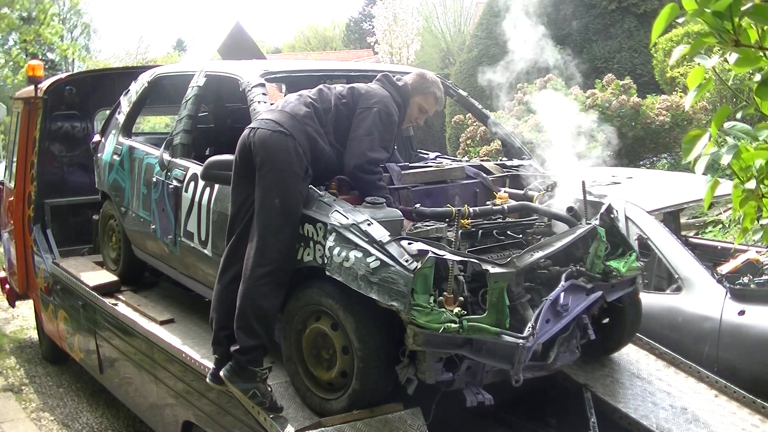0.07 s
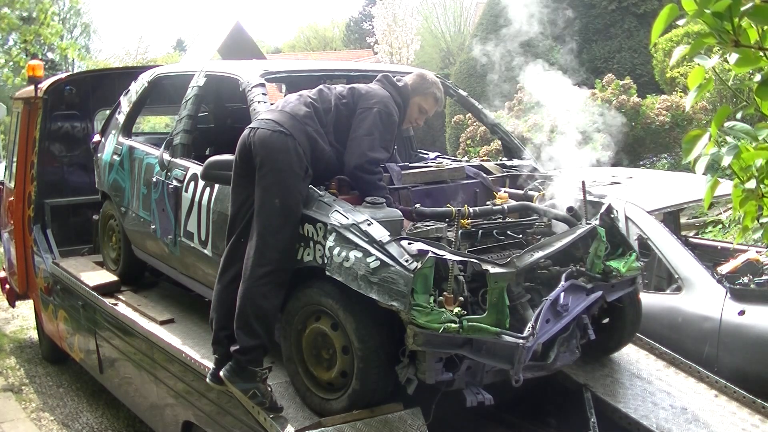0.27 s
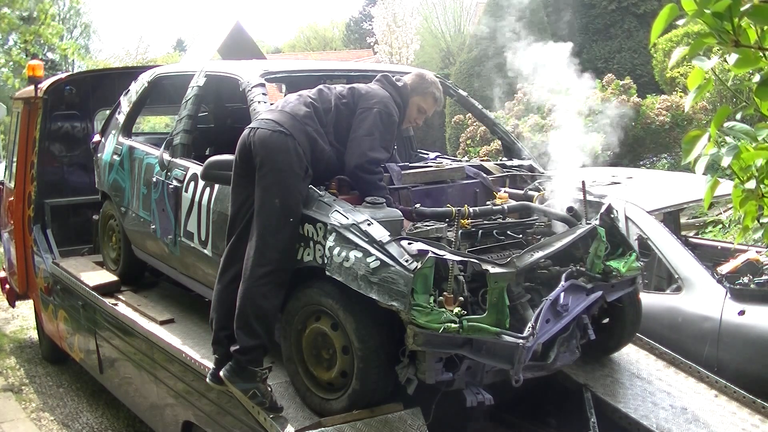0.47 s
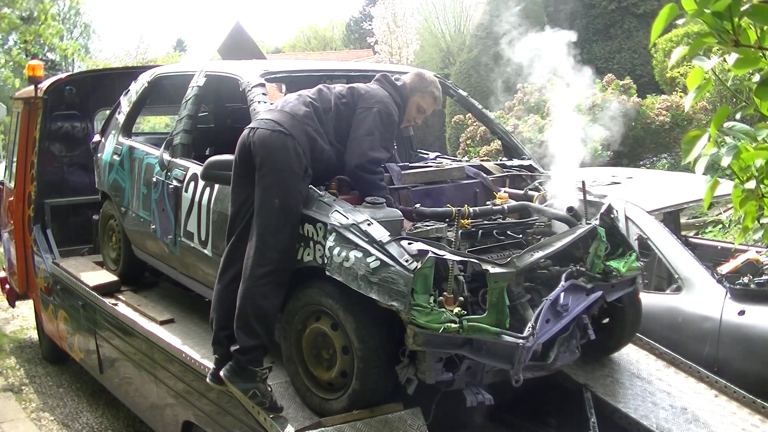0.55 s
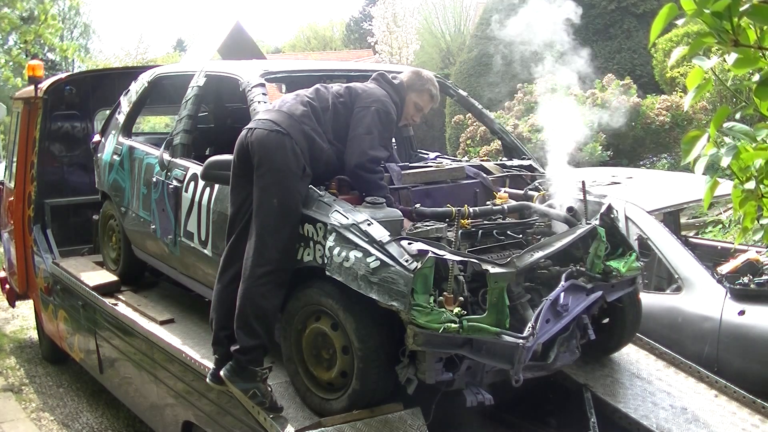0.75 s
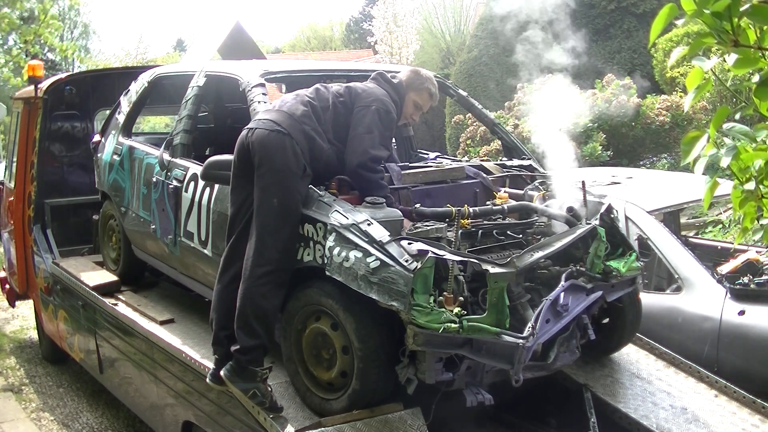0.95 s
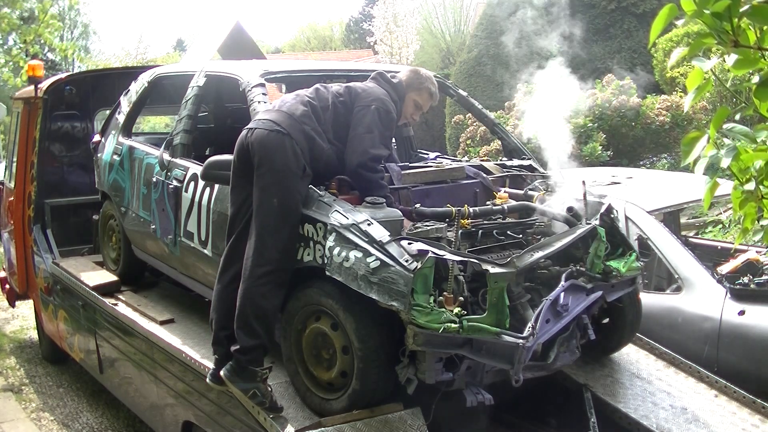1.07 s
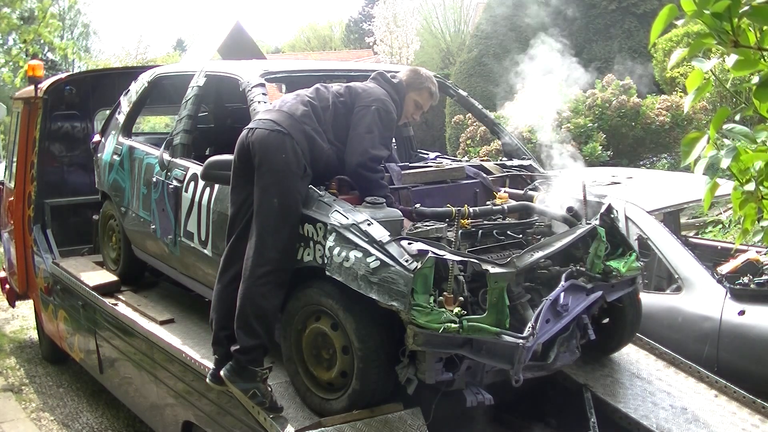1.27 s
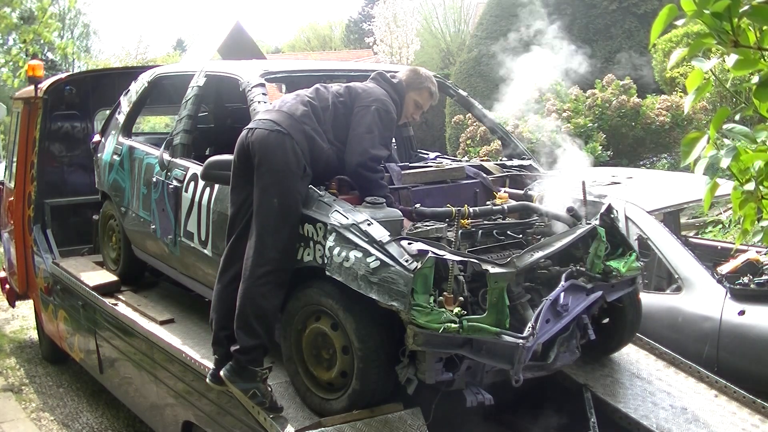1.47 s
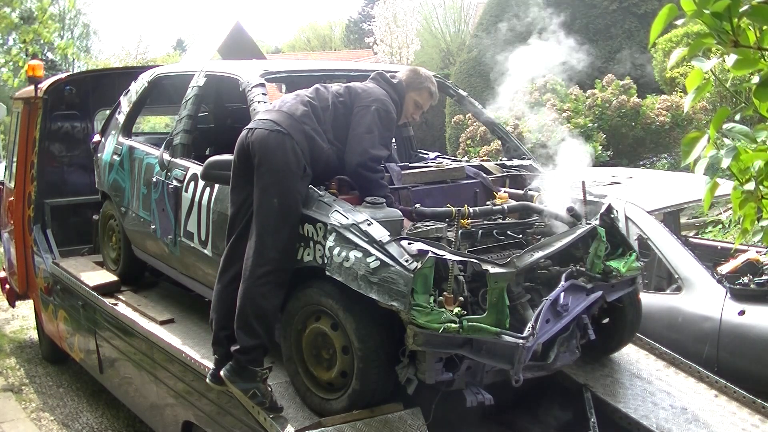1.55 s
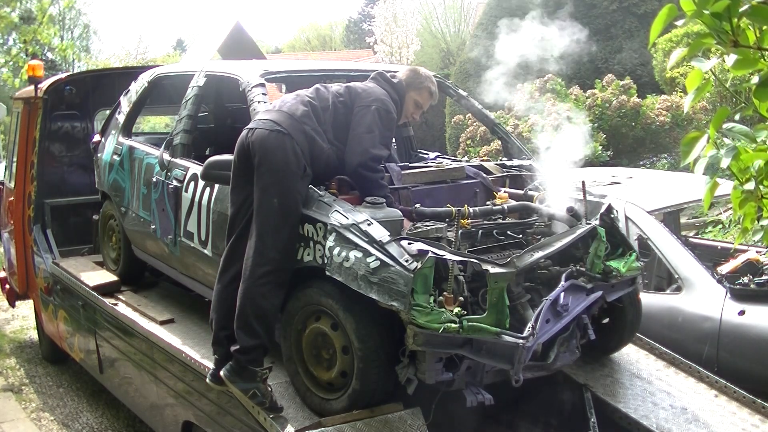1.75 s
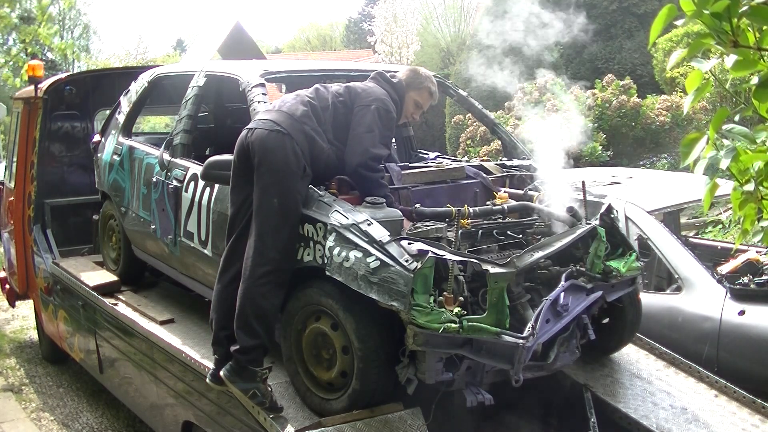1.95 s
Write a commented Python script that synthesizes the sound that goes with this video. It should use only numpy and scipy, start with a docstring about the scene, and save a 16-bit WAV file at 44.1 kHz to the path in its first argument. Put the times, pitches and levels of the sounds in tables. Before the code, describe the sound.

A worn car engine is cranked by its starter, grinding in uneven surges with harsh clanks and brief metal squeaks. It weakens near the end and never catches, heard from near the open engine bay outdoors.

```python
"""A worn engine that won't start

A starter cranks in an open engine bay, outdoors, and the engine never catches. The pinion grinds on
the ring gear in uneven surges and the engine kicks back with harsh clanks that set loose parts ringing.
Dry metal squeaks, a bearing squeals, the starter groans and the cylinders puff weakly.
Block and body panels ring; the yard answers briefly over a faint bed of air."""
import sys
import numpy as np
from scipy import signal
from scipy.fft import rfft, irfft, next_fast_len
from scipy.io import wavfile
from scipy.ndimage import map_coordinates

SR = 44100
rng = np.random.default_rng(int(sys.argv[2]) if len(sys.argv) > 2 else 0)


def inscribe(sig):
    """Save sig as 16-bit PCM at rate SR to the path in sys.argv[1].

    A 1-D sig is mono; a 2-D sig holds one channel per row.
    Samples are clipped to [-1, 1] before scaling.
    """
    pcm = np.round(np.clip(np.atleast_2d(sig).T, -1, 1) * 32767)
    wavfile.write(sys.argv[1], SR, pcm.astype(np.int16))


N = 2 * SR


# bright, gritty EQ of the grind: (frequency [Hz], gain [dB])
GRIND_EQ = [(20, -78), (150, -29), (450, -32), (700, -23), (1100, -11.5), (1650, 1.5), (2600, 3),
            (3150, -0.5), (4000, 4.5), (5000, 1.5), (6400, -3), (7400, -10.5), (10000, -13), (11300, -28.5),
            (15800, -36)]
def grinding():
    """The pinion grinds on the ring gear in surges and keeps rubbing between them."""
    rub = amp(-8) * envelope(CHURN_LEVELS)
    load = np.hypot(rasps(), rub)
    return amp(9) * coloured(teeth(rate_hz=232.8, scrape_db=0) * load, GRIND_EQ)


# surges of the pinion on the ring gear: (start [s], level [dB], attack [s], hold [s])
GEAR_RASPS = [(0.2, -31, 0.0036, 0.013), (0.378, -36.5, 0.0024, 0.014), (0.555, -34, 0.0053, 0.06),
              (0.699, -31, 0.0038, 0.02), (0.808, -32.5, 0.0096, 0.023), (0.95, -42, 0.0046, 0.022),
              (0.993, -32.5, 0.0033, 0.031), (1.159, -32.5, 0.011, 0.056), (1.267, -32, 0.0041, 0.057),
              (1.393, -28, .001, 0.011), (1.442, -40, 0.012, 0.048), (1.604, -35.5, 0.059, 0.012),
              (1.969, -38.5, 0.028, .02)]
def rasps(release_db_per_s=176):
    """Envelope of the load on the gear: each rasp bites, holds and lets go."""
    load = np.zeros(N)
    for start, db, attack, hold in GEAR_RASPS:
        t = clock() - start
        release_db = release_db_per_s * np.maximum(t - attack - hold, 0)
        load = np.maximum(load, np.clip(t / attack, 0, 1) * amp(db - release_db))
    return load


def teeth(rate_hz, scrape_db, jitter=.08, spread_db=3):
    """Gear teeth strike unevenly, each hit trailed by a short scrape; rms 1."""
    phase = np.cumsum(rate_hz * np.exp(jitter * wobble(90))) / SR
    tooth = phase.astype(int)
    strength = amp(spread_db * (2 * rng.random(N) - 1))[tooth]
    hits = np.diff(tooth, prepend=0) * strength * rng.choice([-1, 1], N)
    scrape = rng.standard_normal(N) * strength * np.exp(-(phase % 1))
    return unit(unit(hits) + amp(scrape_db) * unit(scrape))


# kickbacks through the drive, the last row a brief hissing puff: (peak time [s], level [dB], rise [s], fall
# [s], bright over dull [dB])
KICKBACKS = [(0.212, -11.5, 0.00093, 0.0078, 19.5), (0.2204, -14.5, 0.0017, 0.006, 7.5),
             (0.3457, -16.5, 0.0045, 0.022, -5), (0.615, -23.5, 0.0065, 0.0079, -16),
             (0.671, -17, 0.019, 0.028, -13), (.738, -32.5, 0.0069, 0.071, 3),
             (.856, -25.5, 0.033, 0.012, 29), (1.05, -16, .014, 0.033, -13.5),
             (1.231, -23, 0.0028, 0.023, -7), (1.323, -25, 0.016, 0.016, -21),
             (1.416, -27, 0.0033, 0.013, 0), (1.494, -19, 0.0053, 0.013, 10),
             (1.542, -24, 0.0053, 0.01, 1.5), (1.913, -34, 0.017, 0.013, 13)]
# dull body of the block's clank: (frequency [Hz], gain [dB])
BLOCK_EQ = [(20, -75), (120, -40), (250, -21), (480, -15), (650, -15), (850, -7), (1300, -1), (2400, 0),
            (3200, -7), (5000, -14), (8000, -32), (11000, -55)]
# bright edge of the gear's clash: (frequency [Hz], gain [dB])
CLASH_EQ = [(20, -65), (600, -44), (1700, -1), (3000, -5), (3900, 7), (5000, 8), (6500, -8.5),
            (10000, -18.5), (11500, -29), (15800, -35)]
def clanks(blow_db=25.5, soft_rise_s=.0038):
    """Each kick slams the teeth together: a dull clank of the block and a bright clash of the gear. The last
    row uses the same sound for a brief, bright hissing puff."""
    dull, bright = np.zeros(N), np.zeros(N)
    block = teeth(rate_hz=420, scrape_db=-1.5)
    gear = teeth(rate_hz=410, scrape_db=1)
    for peak, db, rise, fall, bright_db in KICKBACKS:
        t = clock() - peak
        shape = amp(db) * np.exp(np.minimum(t / rise, -t / fall)) / np.hypot(1, amp(bright_db))
        hardness = amp(blow_db) * np.exp(-rise / soft_rise_s)  # slow kicks land softly
        blow = hardness * (np.arange(N) == round(peak * SR))
        dull += shape * (block + blow)
        bright += shape * amp(bright_db) * (gear + blow)
    return coloured(dull, BLOCK_EQ) + coloured(bright, CLASH_EQ)


# metal ringing on hard clanks: (start [s], pitch [Hz], level [dB], fall [s], flutter depth [Hz])
PART_RINGS = [(.3445, 843, -32, .028, 24), (.3432, 2500, -13.5, .007, 160), (1.489, 1275, -21, .018, 130),
              (1.4875, 2750, -12.5, .009, 130), (1.489, 2380, -22, .024, 150)]
def loose_parts(rise_s=.0015):
    """Struck loose parts ring at once and buzz as they die away."""
    ringing = np.zeros(N)
    for start, hz, db, fall, flutter_hz in PART_RINGS:
        t = np.maximum(clock() - start, 0)
        ringing += amp(db) * (1 - np.exp(-t / rise_s)) * np.exp(-t / fall) * tone(hz, flutter_hz)
    return ringing


# dry metal chirps: (peak time [s], pitch [Hz], level [dB], half length [s], flutter depth [Hz])
METAL_SQUEAKS = [(.625, 3890, -29, .012, 110), (1.003, 1836, -18, 0.0064, 95),
                 (1.242, 1700, -24.5, 0.014, 160), (1.262, 7030, -24, .006, 70),
                 (1.284, 7010, -28, .007, 70), (1.415, 1650, -29, 0.019, 170),
                 (1.645, 1640, -34, .012, 150), (1.745, 1710, -34, .016, 160)]
def squeaks():
    """Dry metal sings for a moment, cleanly or hoarsely."""
    return sum(swell(*row, sag_per_s=.6) for row in METAL_SQUEAKS)


# the bearing's notes: (peak time [s], pitch [Hz], level [dB], half length [s])
BEARING_NOTES = [(0.733, 566.6, -28.5, 0.018), (.842, 513.4, -24.5, 0.023)]
# their overtones, with no fundamental: (multiple of the pitch, gain [dB])
BEARING_PARTIALS = [(2, -14), (3, -2), (4, -5), (5, -4.5), (8, -9.5)]
def bearing_squeals():
    """A dry bearing sticks and slips, its squeal sinking as the shaft slows."""
    return sum(swell(*row, flutter_hz=11, sag_per_s=.8, partials=BEARING_PARTIALS)
               for row in BEARING_NOTES)


# fader ride of the turning engine: (time [s], level [dB])
CHURN_LEVELS = [(0.19, -71), (0.22, -42), (.72, -43.5), (.83, -44), (1.046, -41), (1.44, -40),
                (1.55, -50.5), (1.606, -40.5), (1.812, -47), (1.904, -69), (1.964, -39), (2.0, -46)]
# mid-heavy EQ of the churn: (frequency [Hz], gain [dB])
CHURN_EQ = [(20, -33), (60, -25), (110, -21), (180, -30), (260, 0), (480, 3.5), (670, -5.5), (900, 4.5),
            (1250, -1.5), (1650, 5.5), (2500, 3.5), (3300, -15.5), (4800, 1.5), (7000, -16), (15800, -66)]
def churning():
    """Starter and valve gear rattle more steadily under the grind."""
    return amp(5) * coloured(teeth(rate_hz=310, scrape_db=12.5) * envelope(CHURN_LEVELS), CHURN_EQ)


# low groans under load: (peak time [s], pitch [Hz], level [dB], half length [s])
STARTER_NOTES = [(.41, 345, -47, .03), (.71, 235, -48, .035), (1.69, 325, -46, .03)]
def starter_groans():
    """The starter's note falls as compression drags it down."""
    return sum(swell(*row, flutter_hz=18.7, sag_per_s=2.3) for row in STARTER_NOTES)


# weak breaths of the cylinders: (peak time [s], level [dB], half length [s])
CYLINDER_PUFFS = [(0.66, -43.5, 0.021), (1.25, -48, 0.023), (1.352, -47, 0.028)]
# muffled EQ of a puff: (frequency [Hz], gain [dB])
PUFF_EQ = [(20, -41), (60, -20), (100, -4.5), (200, 2.5), (300, 13.5), (2000, -92)]
def puffs():
    """Unburnt charge leaves the cylinders in soft, low puffs."""
    shape = sum(amp(db) * bell(peak, half) for peak, db, half in CYLINDER_PUFFS)
    return coloured(shape * rng.standard_normal(N), PUFF_EQ)


# resonances of block and panels: (frequency [Hz], boost [dB], width [Hz])
BAY_MODES = [(504, 8.5, 35), (846, 10, 12), (1102, 7.5, 28), (1356, 8, 23), (1499, 11.5, 6.8),
             (1634, 4, 42), (1731, 6, 82), (2087, 5, 63), (2320, 9, 11), (2797, 6, 46), (3320, 8, 21),
             (4742, 4.5, 37)]
def engine_bay(x, paths_s=(.0006, .0017), reflection=.58):
    """Block and panels ring, and short reflections in the bay smear each impact."""
    def resonance(hz):
        return 1 + sum((amp(db) - 1) / (1 + (2 * (hz - centre) / width) ** 2)
                       for centre, db, width in BAY_MODES)

    def allpass(hz):
        delays = np.exp(-2j * np.pi * np.outer(paths_s, hz))
        return np.prod((delays - reflection) / (1 - reflection * delays), axis=0)

    return filtered(causal(x, resonance), allpass)


def reverb(x, t60_s):
    """Scattered reflections blur into a tail of decaying noise; wet only, at unity energy."""
    t = clock()[:SR // 2]
    tail = rng.standard_normal(len(t)) * amp(-60 * t / t60_s)
    return signal.fftconvolve(x, tail / np.linalg.norm(tail))[:N]


# EQ of the outdoor bed: (frequency [Hz], gain [dB])
AIR_EQ = [(20, -80), (90, -19.5), (160, -11.5), (250, 0.5), (400, -5.5), (650, -10.5), (1200, -6),
          (1700, 0), (2600, 0), (3300, -6.5), (5000, -10), (7400, -13), (8500, -22), (15800, -30)]
def air():
    """A faint, steady hush lies behind the engine."""
    return amp(-48) * coloured(rng.standard_normal(N), AIR_EQ)


# a panel's reflection: (frequency [Hz], side gain [dB])
PANEL_SIDE = [(100, -17), (600, -57), (2000, -18.5), (6000, -9.5)]
# scattered sound: (frequency [Hz], side gain [dB])
SCATTER_SIDE = [(50, -10), (200, -18), (2000, -13), (5000, -19), (9000, -17), (13000, -3.5)]
# balance across the spectrum: (frequency [Hz], left over right [dB])
BALANCE = [(40, 0), (200, 4), (500, 4.5), (1000, 2.5), (2000, 0.9), (4000, -1.5), (9000, 1)]
def stereo(mid, panel_delay_s=.000925):
    """A panel's reflection and scattered sound reach left and right in opposite phase, adding width."""
    panel = filtered(mid, lambda hz: amp(along(PANEL_SIDE, hz)) * np.exp(-2j * np.pi * hz * panel_delay_s))
    scatter = filtered(reverb(mid, t60_s=.093), lambda hz: amp(along(SCATTER_SIDE, hz)))
    side = panel + scatter
    pair = np.array([mid + side, mid - side])
    return filtered(pair, lambda hz: amp(np.outer([.5, -.5], along(BALANCE, hz))))


def tone(hz, flutter_hz, glide=1, partials=((1, 0),)):
    """A tone whose pitch flutters; the deeper the flutter, the more its level chatters."""
    rate = .22 * hz  # flutters a second
    chatter_db = flutter_hz / 55
    phase = 2 * np.pi * np.cumsum(hz * glide + flutter_hz * wobble(rate)) / SR
    return sum(amp(db) * unit(np.sin(k * phase) * amp(chatter_db * wobble(rate))) for k, db in partials)


def swell(peak, hz, db, half, flutter_hz, sag_per_s, partials=((1, 0),)):
    """A short tone that swells and fades on a sagging pitch."""
    glide = np.exp(-sag_per_s * (clock() - peak))
    return amp(db) * bell(peak, half) * tone(hz, flutter_hz, glide, partials)


def bell(peak_s, half_s):
    """A Gaussian fade in and out."""
    return np.exp(-.5 * ((clock() - peak_s) / half_s) ** 2)


def envelope(points):
    """Gain per sample from (time [s], level [dB]) points; silent before the first."""
    times, db = np.transpose(points)
    return amp(np.interp(clock(), times, db, left=-120))


def wobble(rate):
    """A smooth random curve, rate knots a second."""
    return map_coordinates(rng.standard_normal(int(N * rate / SR) + 4), [np.arange(N) * rate / SR])


def coloured(x, eq):
    """Shape x with an EQ curve; only the curve's shape counts, not its overall level."""
    return causal(x, lambda hz: amp(along(eq, hz)))


def causal(x, gain, taps=8192):
    """Minimum-phase filter: no pre-ring, and white noise keeps its power."""
    cepstrum = irfft(np.log(unit(gain(np.fft.rfftfreq(2 * taps, 1 / SR)))))
    cepstrum[1:taps] *= 2
    cepstrum[taps + 1:] = 0
    impulse = irfft(np.exp(rfft(cepstrum)))[:taps]
    return signal.fftconvolve(x, impulse)[:N]


def filtered(x, response):
    """Multiply the spectrum of x by response(hz)."""
    size = next_fast_len(N + SR // 2)
    return irfft(rfft(x, size) * response(np.fft.rfftfreq(size, 1 / SR)), size)[..., :N]


def along(points, hz):
    """Read a curve on a log frequency axis."""
    freqs, values = np.transpose(points)
    return np.interp(np.log(hz + 1), np.log(freqs + 1), values)


def amp(db):
    """Decibels to gain."""
    return 10 ** (np.asarray(db) / 20)


def unit(x):
    """Scale to rms 1."""
    return x / np.sqrt(np.mean(x ** 2) + 1e-20)


def clock():
    """Time of each sample in seconds."""
    return np.arange(N) / SR


def scene():
    """The engine in the yard, its bass leaning left and its treble spread wide."""
    drive = engine_bay(grinding() + churning() + clanks())
    engine = drive + squeaks() + bearing_squeals() + loose_parts() + starter_groans() + puffs()
    yard = amp(-13.5) * reverb(engine, t60_s=.37)
    return stereo(engine + yard + air())


def record(dry):
    """A brick-wall high cut takes off the very top."""
    return filtered(dry, lambda hz: hz < 15850)


dry = scene()
out = record(dry)
inscribe(out)
```